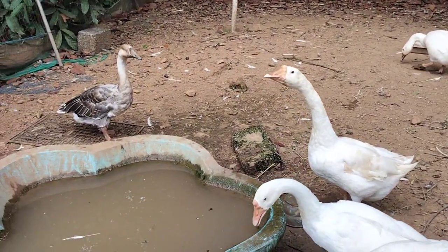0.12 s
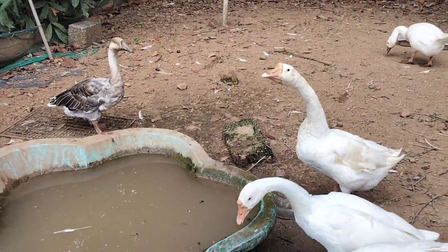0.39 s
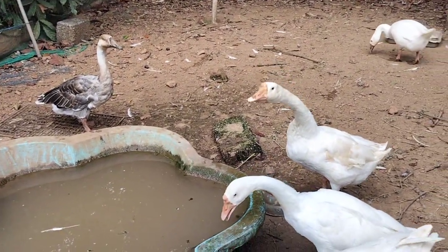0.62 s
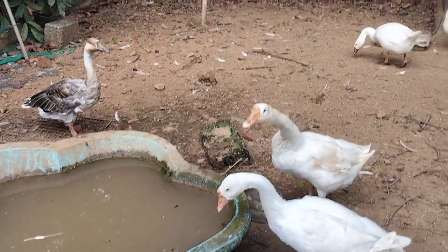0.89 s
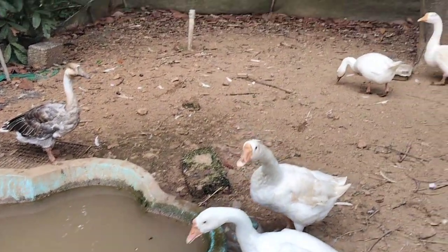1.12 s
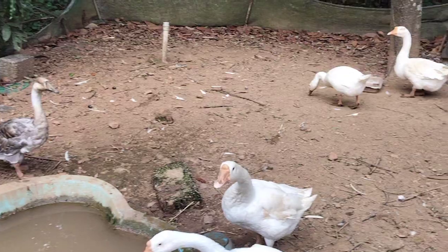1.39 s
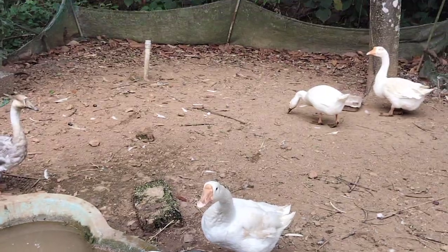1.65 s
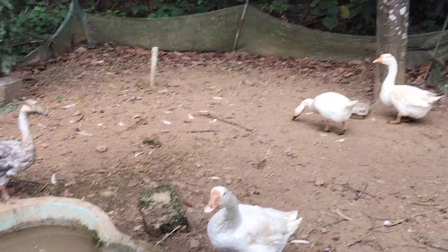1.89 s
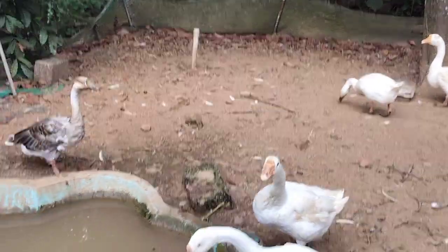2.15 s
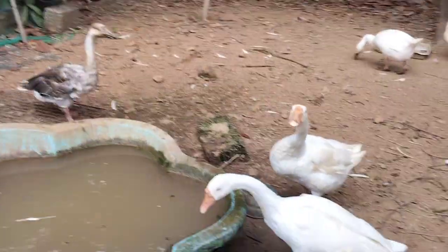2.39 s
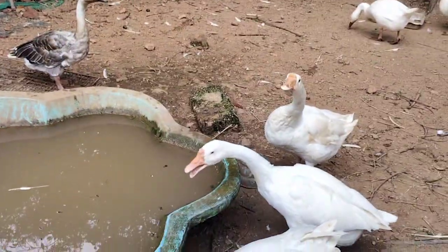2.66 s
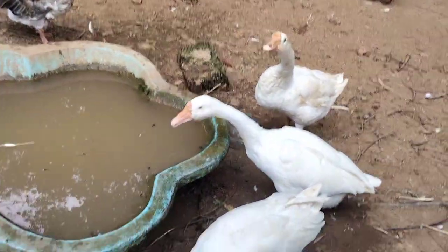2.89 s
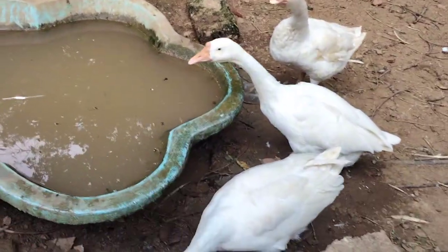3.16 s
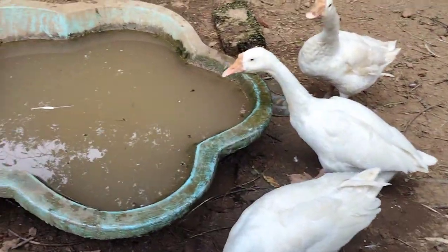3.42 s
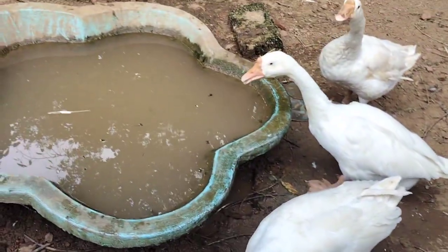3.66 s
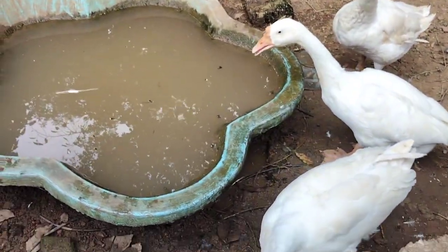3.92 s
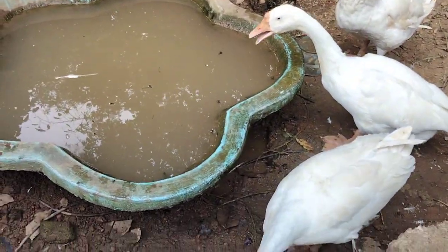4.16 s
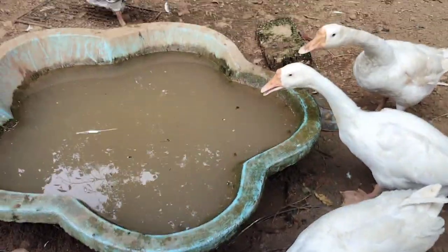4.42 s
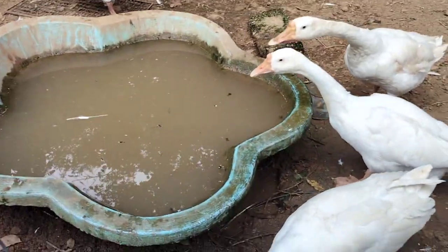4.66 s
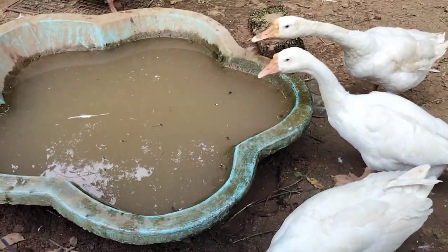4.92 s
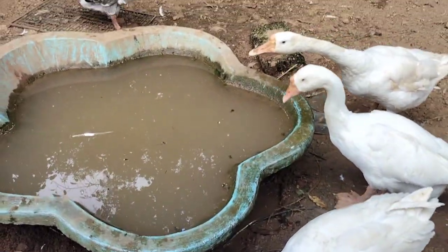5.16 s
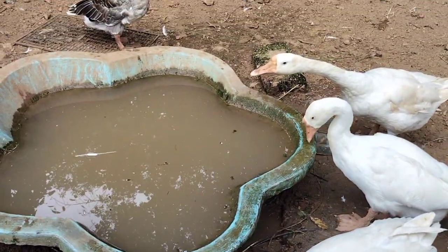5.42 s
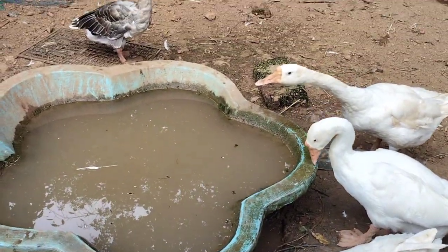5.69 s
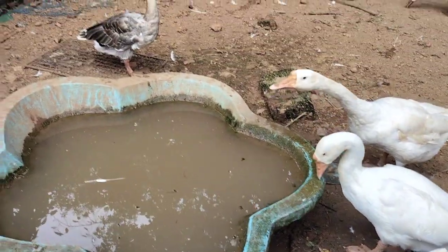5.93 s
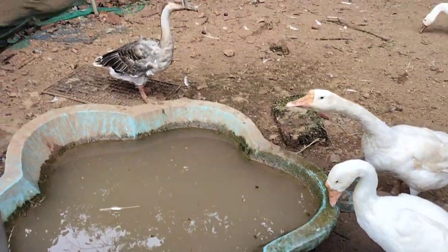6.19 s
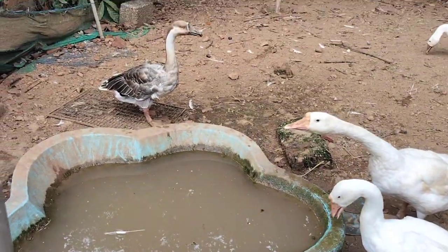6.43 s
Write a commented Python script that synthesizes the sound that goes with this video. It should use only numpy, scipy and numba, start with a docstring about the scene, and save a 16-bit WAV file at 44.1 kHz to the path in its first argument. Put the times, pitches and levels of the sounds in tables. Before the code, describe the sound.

In an open farmyard, a few geese close by honk in brassy, hoarse bouts, with high clear cries and thin squeals breaking across them. Short gaps let a faint motor hum and soft outdoor air through. The loudest outburst comes a little past the middle, followed by a quiet stretch with tiny far bird calls, then weaker honks. Stereo pickup, near the birds, with a short ground reflection and faint trailing echo.

```python
"""A clear high goose cry and a low honk break in almost together over the hum and air of an open yard.
Geese honk in bouts: voice-box pulses ring the bill, throat and long neck, and a chest tone hums along.
High cries are stacks of partials that crack as the pitch sags; squeals are two voices at once.
The yard is motor tones, shaped noise and faint far calls; ground, fences and trees return noise tails."""
import sys
import numpy as np
from scipy import signal
from scipy.fft import rfft, irfft
from scipy.io import wavfile
from scipy.ndimage import uniform_filter1d, map_coordinates
from numba import njit

SR = 44100
rng = np.random.default_rng(int(sys.argv[2]) if len(sys.argv) > 2 else 0)


def natural_amplitude(level_db):
    """Convert a level in decibels to a linear amplitude factor, elementwise."""
    exponent = np.asarray(level_db, float) / 20
    return 10 ** exponent


def transcribe(u):
    """Save the signal u as a 16-bit wav file named by the first command-line argument.

    u: samples, shape (n,) or (channels, n), limited to [-1, 1]; the rate is SR.
    q: integer samples, one column per channel.
    """
    v = np.clip(np.atleast_2d(u).T, -1, 1)
    q = np.round(v * 32767).astype(np.int16)
    wavfile.write(sys.argv[1], SR, q)


N = 289283
T = np.arange(N) / SR
EFFORT_REF_DB = -35


def level(x):
    """Scale to rms 1."""
    return x / np.sqrt(np.mean(x ** 2))


def play(calls, slew_s):
    """Join call tables into slewed control curves and a gate that is open during calls."""
    s, *columns = np.concatenate(calls).T
    gate = sum((T >= call[0][0]) & (T < call[-1][0]) for call in calls) > 0
    slew = int(slew_s * SR)
    curves = [uniform_filter1d(np.interp(T, s, column), slew) for column in columns]
    return uniform_filter1d(1. * gate, slew), curves


@njit
def ring(x, hz, width_hz):
    """State-variable band-pass with a moving centre, gain 1 at the centre."""
    y, band_state, low_state = np.empty(len(x)), 0., 0.
    for i in range(len(x)):
        g, damping = np.tan(np.pi * hz[i] / SR), width_hz / hz[i]
        v = (band_state + g * (x[i] - low_state)) / (1 + g * (g + damping))
        band_state = 2 * v - band_state
        low_state += 2 * g * v
        y[i] = damping * v
    return y


def band(x, hz, width_hz):
    """Steep resonance: the band-pass twice, each of the given width."""
    hz = hz + np.zeros(N)
    return ring(ring(x, hz, 1. * width_hz), hz, 1. * width_hz)


def walk(rate_hz):
    """Smooth random wander of rms 1: noise averaged twice over 1/rate_hz."""
    k = int(SR / rate_hz)
    return level(uniform_filter1d(uniform_filter1d(rng.standard_normal(N), k), k))


def place(x, pan_db, lag):
    """Share between two ports, left louder by pan_db; the left hears it lag samples later."""
    late = map_coordinates(x, [np.arange(N) - lag + np.zeros(N)], order=3)
    return np.array([late * natural_amplitude(pan_db / 2), x * natural_amplitude(-pan_db / 2)])


# far motor tones: pitch_hz, level_db
HUM = [(80.7, -72), (118.4, -65), (161.5, -54), (236.9, -67)]
# spectral shape of outdoor air: freq_hz, density_db (relative, per Hz)
YARD = [(24, -39.5), (40, -15.5), (164, -8), (206, -17.5), (321, -23), (554, -33.5), (676, -11.5),
        (980, -48.5), (1260, -25), (1350, -34.5), (3300, -45), (15000, -56.5)]
AIR_DB = -53.5
# far flock blurred into noise bands: centre_hz, filter_width_hz, level_db
MURMUR = [(614, 19.73, -77.5), (890, 180, -73)]
# faint far calls: start_s, end_s, start_hz, end_hz, filter_width_hz, level_db (at the top of the swell)
FAR = [(5.0, 5.07, 4650, 4500, 250, -67), (5.13, 5.26, 4100, 3100, 150, -68),
       (5.52, 5.72, 2050, 2050, 200, -67), (5.52, 5.72, 2560, 2500, 300, -70)]


def yard():
    """Wavering motor sines, shaped air noise and band noise for far birds; the bass is nearly mono."""
    hum = sum(natural_amplitude(db + 2.5 * walk(5)) * np.sqrt(2) * np.sin(2 * np.pi * hz * T) for hz, db in HUM)
    f_hz = np.maximum(np.fft.rfftfreq(N, 1 / SR), 1)
    yard_hz, yard_db = np.transpose(YARD)
    colour = natural_amplitude(np.interp(np.log(f_hz), np.log(yard_hz), yard_db))
    mid, side = rfft(rng.standard_normal((2, N))) * colour
    side = side * np.clip(0.057 + f_hz / 2500, 0, 1)
    air = natural_amplitude(AIR_DB) * level(irfft([mid + side, mid - side], N))
    far = 0
    for hz, width_hz, db in MURMUR:
        far = far + natural_amplitude(db + 4 * walk(15)) * level(band(rng.standard_normal(N), hz, width_hz))
    for start_s, end_s, start_hz, end_hz, width_hz, db in FAR:
        swell = np.sin(np.pi * np.clip((T - start_s) / (end_s - start_s), 0, 1))
        glide_hz = np.interp(T, [start_s, end_s], [start_hz, end_hz])
        far = far + natural_amplitude(db) * swell * level(band(rng.standard_normal(N), glide_hz, width_hz))
    return hum + air + place(far, 0, 1.6)


# clear high cries, in lists played in turn: time_s, pitch_hz, effort_db,
# even_lift_db (on even partials; odd ones above the first get 3/4 of it)
CRIES = [
    [(0, 956, -32, 6), (.09, 1024, -34.5, 7.5), (.13, 985, -27.5, 18)],
    [(.4, 992, -37.5, 6.5), (.43, 999, -28, -5.5), (.49, 1044, -30.5, 14.5), (.62, 1042, -28.5, 5.5)],
    [(1.15, 1060, -29, -3), (1.18, 1126, -28, -4), (1.215, 1115, -46, -4)],
    [(2.402, 992, -29.5, -13), (2.412, 984, -21, 10.3), (2.435, 986, -50, -1)],
    [(3.915, 543, -13, -1.5), (3.97, 594, -11.5, 2.5), (4.014, 620, -12.5, 2), (4.035, 607, -17, 3.5),
     (4.07, 564.5, -14.5, 2.5), (4.09, 517.5, -17.5, -1.5), (4.105, 502.3, -38.5, -7.5)],
    [(4.19, 726.7, -13.5, -16), (4.21, 763.5, -16, 3.5), (4.24, 767.6, -22, 16), (4.27, 782.2, -20, 1)],
    [(4.283, 594.5, -22.5, 11), (4.303, 595, -20.5, 14.5), (4.333, 641, -20, 15),
     (4.345, 669.4, -28.5, 19.5)],
    [(4.46, 1243, -38.5, -15.5), (4.5, 1290, -29, -18.5), (4.6, 1284, -31.5, 26),
     (4.645, 1275, -38.5, 30.5), (4.74, 1257, -59, 30)],
    [(6.115, 870, -67, 21.5), (6.16, 1152, -48, 10)],
    [(6.171, 746, -33, -6), (6.274, 795, -33.5, 6.5), (6.4, 835, -36, 9), (6.56, 854, -37, 16.5)],
]
# throat and bill colour of the partials: freq_hz, gain_db
CRY_THROAT = [(550, -27), (780, -5), (1000, -2.5), (1220, 3), (1600, -11.5), (1900, -5.5), (2600, -16.5),
              (3200, -16.5), (4500, -23), (5800, -28.5), (15000, -61.5)]
SOFT_CRY_DULLING = 0.15  # dB per octave lost for each dB of effort below 0
CRACK_DECAY_S, CRACK_AIR_DB, CRACK_DEPTH = .022, 30, .5


def cries():
    """Stacks of 12 partials; as the pitch sags every second cycle differs and lines appear between them."""
    gate, (hz, effort_db, even_lift_db) = play(CRIES, .008)
    turn = 2 * np.pi * np.cumsum(hz * (1 + 0.0037 * walk(63.1))) / SR
    throat_hz, throat_db = np.transpose(CRY_THROAT)
    tone = 0
    for k in range(1, 13):
        colour_db = np.interp(np.log(k * hz), np.log(throat_hz), throat_db)
        lift_db = even_lift_db * (k > 1) * (1, .75)[k % 2]
        dulling_db = SOFT_CRY_DULLING * effort_db * np.log2(k)
        waver_db = (1.5 + .3 * (k - 1)) * walk(30)
        gain = natural_amplitude(effort_db + colour_db + lift_db + dulling_db + waver_db)
        tone = tone + gain * np.sin(k * turn + (k - 1) ** 2)
    sagging = np.abs(np.gradient(hz) * SR + 2200) < 1800  # falling 400-4000 Hz a second
    sag = uniform_filter1d(1. * sagging, 400)
    # the voice cracks as the sag sets in: a short spell of uneven cycles and air
    since_sag_s = T - np.maximum.accumulate(T * ~sagging)
    crack = sag * np.exp(-since_sag_s / CRACK_DECAY_S)
    # rushing air, chopped once a cycle
    air = level(band(rng.standard_normal(N), 3200, 3200))
    rasp = natural_amplitude(effort_db + even_lift_db - 32.0 + CRACK_AIR_DB * crack) * (1 + np.sin(turn)) * air
    uneven = 1 + (0.033 * sag + CRACK_DEPTH * crack) * np.sin(turn / 2)
    return gate * (np.sqrt(2) * tone * uneven + rasp)


# chest tone: dB per dB of effort, effort above which it grows no more, reference pulse rate
CHEST_PER_EFFORT, CHEST_FULL_DB, CHEST_REF_HZ = 0.33, -28, 195


def chest_level(base_db, db_per_octave, effort_db, hz):
    """The chest tone grows slowly with effort, up to a limit, and changes with the pulse rate."""
    growth_db = CHEST_PER_EFFORT * (np.minimum(effort_db, CHEST_FULL_DB) - EFFORT_REF_DB)
    return base_db + growth_db + db_per_octave * np.log2(hz / CHEST_REF_HZ)


# neck resonances: centre_hz (with the bill at its reference), filter_width_hz, level_db (relative)
NECK = [(2330, 480, 11.5), (3135, 480, 7), (3800, 600, 5), (4450, 560, 6), (5718, 1300, 2),
        (9620, 720, -21), (11800, 3000, -20)]
NECK_PATCHY_DB = 4
TREBLE_PER_EFFORT = 0.24  # tilt of the neck, dB per octave for each dB of effort
BILL_SKIRT_DB = -3
BILL_SHAKE = .06  # share by which a hoarse call shakes the bill resonance
# slow pulses ring like short whistles at bill multiples 2, 3, 4: level_db (at 100 pulses a second)
BURST_DB = [-17, -27, -22]
BURST_DB_PER_OCTAVE = -11.5  # of pulse rate


def honks(gate, hz, bill_db, chest_db, bill_hz, neck_db, rough_curve,
          throat_db, throat_hz, neck_ref_hz, width_hz, throat_air):
    """Voice-box pulses, uneven when hoarse, ring bill, throat and neck; the chest hums the pulse rate."""
    rough = np.interp(T, *np.transpose(rough_curve))
    cycles = np.cumsum(hz * (1 + 0.0035 * walk(25.37)) / SR)
    # after each closed gate the count restarts half a cycle before a pulse
    begun = np.maximum.accumulate(cycles * (gate < .01))
    cycles = cycles - begun + np.ceil(begun) + .5
    # hoarse folds close early or late and with uneven force
    shaky = np.maximum.accumulate(cycles + .13 * rough ** 2 * walk(400))
    at = np.flatnonzero(np.diff(np.floor(shaky))) + 1
    late = shaky[at] % 1 / (shaky[at] - shaky[at - 1])
    force = np.sqrt(SR / hz[at]) * natural_amplitude(3.5 * (rough * walk(600))[at])
    # windowed sinc puts each pulse between samples
    pulses = np.full(N, 1e-18)
    for k in range(-4, 4):
        kernel = np.sinc(k + late) * np.cos(np.pi * (k + late) / 8) ** 2
        pulses[np.clip(at + k, 0, N - 1)] += force * kernel
    breath = rough * np.exp(-(shaky % 1) / 1.2) * rng.standard_normal(N)
    drive = ((1 - .6 * rough ** 2) * pulses + 1.3 * breath) / natural_amplitude(4 * rough)

    # narrow bill resonance, fed by a broad one just above
    bill_hz = bill_hz * (1 + BILL_SHAKE * rough * walk(45))
    skirt = band(drive, 1.05 * bill_hz, 900)
    bill = level(ring(skirt, bill_hz, 1. * width_hz)) + natural_amplitude(BILL_SKIRT_DB) * level(skirt)
    for k, db in enumerate(BURST_DB):
        burst = level(band(drive, (k + 2) * bill_hz, 2 * width_hz))
        bill = bill + natural_amplitude(db + BURST_DB_PER_OCTAVE * np.log2(hz / 100)) * burst

    throat = natural_amplitude(throat_db) * level(band(drive + throat_air * breath, throat_hz, 190))

    # the opening bill lifts the upper resonances too
    stretch = (bill_hz / neck_ref_hz) ** .45 * (1 + .035 * walk(6))
    hiss = drive + 1.4 * breath + 0.58 * rng.standard_normal(N)
    neck = 0
    for k, (centre_hz, neck_width_hz, db) in enumerate(NECK):
        tilt_db = np.log2(centre_hz / 4000) * TREBLE_PER_EFFORT * (neck_db - EFFORT_REF_DB)
        gain = natural_amplitude(db + NECK_PATCHY_DB * walk(7.7) + tilt_db)
        neck = neck + (-1) ** k * gain * band(hiss, centre_hz * stretch, neck_width_hz)
    neck = level(neck)

    turn = 2 * np.pi * cycles
    chest = np.sqrt(2) * (np.sin(turn) + natural_amplitude(-14.5) * np.sin(2 * turn)) * natural_amplitude(3 * rough * walk(40))
    return gate * (natural_amplitude(bill_db) * bill + natural_amplitude(neck_db) * neck + natural_amplitude(chest_db) * (chest + throat))


# nearest goose, each list one or more honks or part of one:
# time_s, pulse_rate_hz, effort_db, blare_db (bill over effort), bill_hz
NEAR = [
    [(.027, 104.9, -44.5, 12, 1242), (.05, 136.4, -40, 16.5, 1346), (.1, 199.7, -38.5, 17.5, 1590),
     (.17, 203, -28, 6.5, 1492), (.256, 183.3, -30.5, -0.5, 1358), (.29, 202.5, -45, -7.5, 1400)],
    [(.47, 195.1, -29.5, -12, 1098), (.49, 195.6, -26, -2, 1206), (.574, 193.7, -25, -3.5, 1453),
     (.7, 195.1, -31, -1, 1396), (.74, 177.1, -47.5, -6, 1553)],
    [(.921, 185.1, -41.5, 10, 1300), (.94, 180.3, -29.5, 6.5, 1440), (1.03, 192, -29.5, 11.5, 1535),
     (1.06, 188.5, -32.5, 8.5, 1450), (1.14, 190.3, -35.5, 3, 1394), (1.17, 174, -54.5, 14, 1255),
     (1.22, 197.7, -54.5, 4, 1432), (1.27, 191, -47.5, 1.5, 1495), (1.43, 193.3, -45, 0, 1450),
     (1.46, 185.7, -41, 3.5, 1178), (1.5, 188.1, -41, 4.5, 1226), (1.56, 171.4, -70.5, 5, 1266)],
    [(1.9105, 100.5, -49.5, 6, 1132), (1.92, 106.9, -41, 19, 1150), (1.985, 140.5, -35, 12.5, 1246),
     (2.03, 176.6, -33.5, 8, 1529), (2.095, 187.4, -33, 0, 1748), (2.125, 194, -32.5, -14, 1690),
     (2.15, 193, -87, -20.5, 1683)],
    [(2.418, 168.5, -28.5, -2, 1126), (2.435, 173.2, -30.5, 1.5, 1164), (2.56, 184.6, -32.5, 1.5, 1616),
     (2.617, 190.9, -37.5, 2.5, 1494), (2.627, 197, -36, 2, 1401), (2.73, 208.5, -26.5, -1.5, 1632),
     (2.775, 208.7, -22.5, 0.5, 1376), (2.81, 204, -45.5, 4, 1323)],
    [(3.862, 105.7, -40.5, 12, 1103), (3.9, 123.6, -32.5, 14, 1172), (3.93, 135, -33, 7.5, 1145)],
    [(4.17, 215.3, -37, 12, 1422), (4.24, 210.4, -25.5, -7, 1295), (4.295, 216.5, -21.5, 2, 1210),
     (4.32, 212.2, -18, -11, 1200), (4.35, 208.7, -19, 7, 1263), (4.38, 204.4, -19.5, 1.5, 1300),
     (4.405, 199.8, -11, -13.5, 1206), (4.44, 194.4, -27.5, -23.5, 1240)],
    [(4.446, 99.3, -46.5, 25.5, 3384), (4.472, 100.4, -59, 6, 3300)],
    [(5.793, 99.6, -53, 10, 1135), (5.85, 118.5, -48.5, 6, 1034), (5.885, 134.6, -47.5, 7, 1237),
     (5.964, 175, -42.5, -4, 1110), (6.0, 189, -95.5, 25, 1218)],
    [(6.3, 173.3, -48.5, 4, 1219), (6.376, 160.5, -39, 0.5, 1207), (6.526, 189.2, -40.5, 4, 1450),
     (6.56, 192, -38.5, -17, 1470)],
]
# hoarseness: time_s, roughness (0-1)
NEAR_ROUGH = [(0, .6), (1.04, .6), (1.07, .08), (1.2, .2), (1.26, .03), (1.43, .03), (1.46, .5),
              (2.03, .55), (2.07, .1), (2.47, .55), (2.5, .2), (2.59, .2), (2.615, .7), (2.63, .18),
              (2.74, .18), (2.76, .75), (3.9, .45), (4.22, .1), (4.27, .12), (4.33, .95), (4.39, .8),
              (4.41, .3), (5.9, .3), (6.3, .5)]
# throat resonance: time_s, throat_hz
NEAR_THROAT = [(2.6, 760), (2.63, 630), (4.5, 645), (5.8, 720)]


def near_goose():
    """Nearest goose: the bill blares apart from the effort that drives neck and chest."""
    gate, (hz, effort_db, blare_db, bill_hz) = play(NEAR, .006)
    chest_db = chest_level(-33.5, 4.5, effort_db, hz)
    throat_hz = np.interp(T, *np.transpose(NEAR_THROAT))
    return honks(gate, hz, effort_db + blare_db, chest_db, bill_hz, effort_db, NEAR_ROUGH,
                 throat_db=-0.5, throat_hz=throat_hz, neck_ref_hz=1450, width_hz=260, throat_air=0)


# geese a step further off, each list one or more honks: time_s, pulse_rate_hz, effort_db, bill_hz
FLOCK = [
    [(.29, 111, -43, 1110), (.432, 136.5, -33.5, 1246), (.5, 137.3, -44.5, 1200)],
    [(.7, 131.4, -34, 1390), (.862, 145.8, -37, 1500), (.93, 134.6, -33.5, 1535)],
    [(1.84, 150.3, -67.5, 1200), (1.92, 144.2, -54, 1260)],
    [(2.29, 153.2, -68.5, 1546), (2.34, 160.2, -47, 1525), (2.41, 162.7, -49.5, 1480)],
    [(2.8, 133.7, -34.5, 1450), (2.872, 139, -31.5, 1457), (3.19, 147.8, -29.5, 1464),
     (3.25, 158.7, -32.5, 1612), (3.34, 158.8, -37.5, 1490), (3.39, 158.7, -69.5, 1503)],
    [(3.615, 116.6, -46.5, 1075), (3.709, 151.7, -44, 1105), (3.8, 205.2, -37, 1200),
     (3.875, 203.7, -40, 1223)],
    [(4.105, 157.3, -37.5, 1236), (4.161, 153.1, -32.5, 1286), (4.2, 136, -24.5, 1492)],
    [(4.46, 202.7, -41, 1266), (4.502, 213.4, -29.5, 1215), (4.66, 212.7, -44, 1272),
     (4.72, 211.4, -49, 1263), (4.8, 210, -78.5, 1247)],
    [(6.17, 154.4, -62.5, 1000), (6.21, 156.3, -47, 1050), (6.32, 165.5, -50, 1250)],
]
# hoarseness: time_s, roughness (0-1)
FLOCK_ROUGH = [(0, .35), (.7, .6), (2.4, .7), (2.8, .24), (3.13, .22), (3.22, .9), (4.19, .6), (4.46, .4),
               (4.7, .6), (6.2, .3)]


def flock():
    """Geese further off: the neck grows faster than the bill, so harder calls are brighter."""
    gate, (hz, effort_db, bill_hz) = play(FLOCK, .02)
    neck_db = -35.5 + 1.57 * (effort_db - EFFORT_REF_DB)
    chest_db = chest_level(-46, 0, effort_db, hz)
    return honks(gate, hz, effort_db, chest_db, bill_hz, neck_db, FLOCK_ROUGH,
                 throat_db=4, throat_hz=950, neck_ref_hz=1400, width_hz=240, throat_air=5)


# two-voiced squeals, one list a squeal: time_s, upper_pitch_hz, upper_db, lower_db
SQUEALS = [
    [(.64, 1476, -48.5, -72), (.72, 1498, -27, -44.5), (.79, 1504, -25.5, -39.5), (.92, 1538, -25, -50.5),
     (.99, 1570, -21, -67)],
    [(3.2, 1495, -49, -43), (3.26, 1517, -24.5, -45), (3.35, 1502, -27, -47.5), (3.41, 1450, -63, -70.5)],
]
# partials 1-4 of the upper voice: level_db (over upper_db)
SQUEAL_PARTIALS_DB = [-3, -16.5, -13, -27]


def squeals():
    """Two voices wavering apart; the lower also shows as sum tones above the upper."""
    gate, (hz, upper_db, lower_db) = play(SQUEALS, 0.012)
    upper, lower = (2 * np.pi * np.cumsum(f * (1 + .0035 * walk(50))) / SR for f in (hz, .545 * hz))
    tone = 0
    for k, db in enumerate(SQUEAL_PARTIALS_DB):
        tone = tone + natural_amplitude(upper_db + db + (1.5 + .5 * k) * walk(30)) * np.sin((k + 1) * upper)
    sums = np.sin(upper + lower) + natural_amplitude(-3.5) * np.sin(2 * upper + lower)
    return np.sqrt(2) * gate * (tone + natural_amplitude(lower_db) * (np.sin(lower) + sums))


def scatter(t60_s, start_s, low_hz, top_hz):
    """Two unrelated decaying noise responses of unit energy."""
    t = T[:SR]
    echo = rng.standard_normal((2, SR)) * natural_amplitude(-60 * t / t60_s) * (t > start_s)
    echo = signal.sosfilt(signal.butter(2, [low_hz, top_hz], "band", fs=SR, output="sos"), echo)
    return echo / np.sqrt(np.sum(echo ** 2, axis=1, keepdims=True))


# where the callers stand: time_s, near_left_lag_samples, flock_left_lag_samples
STAND = [(0, 3, 1), (2.2, -2.5, -2), (4.3, 1, 1), (4.5, 2, 9), (5.8, 0, 2)]
PAN_DB, PAN_DB_PER_LAG = 2.07, -0.03  # lag in samples
GROUND_DB, TREES_DB = -4, -27


def scene():
    """All geese, their return from ground, pond rim, fences and trees, and the yard."""
    s, *columns = np.transpose(STAND)
    near_lag, flock_lag = (np.interp(T, s, column) for column in columns)
    trees = natural_amplitude(TREES_DB) * scatter(1.15, 0.00022, 980, 7000)
    heard = yard()
    voices = ((cries(), near_lag), (near_goose(), near_lag), (flock() + squeals(), flock_lag))
    for voice, lag in voices:
        goose = place(voice, PAN_DB + PAN_DB_PER_LAG * lag, lag)
        # each group of voices has its own patch of ground
        ground = natural_amplitude(GROUND_DB) * scatter(0.018, .001, 1800, 15000)
        heard = heard + goose + signal.fftconvolve(goose, ground + trees, axes=1)[:, :N]
    return heard


def top_cut(x):
    """Nothing passes above the cut-off."""
    return signal.sosfilt(signal.butter(12, 15730, fs=SR, output="sos"), x)


def record(dry):
    """The left port is shaded in the treble; the loudest peaks are rounded and the deepest bass is cut."""
    dull = signal.lfilter(*signal.butter(1, 9000, fs=SR), dry[0])
    both = np.array([0.31 * dry[0] + 0.46 * dull, dry[1]])
    rounded = both / (1 + np.abs(both) ** 4) ** .25
    mix = signal.lfilter(*signal.butter(2, 55, "high", fs=SR), rounded)
    return top_cut(mix)


dry = scene()
out = record(dry)
transcribe(out)
```